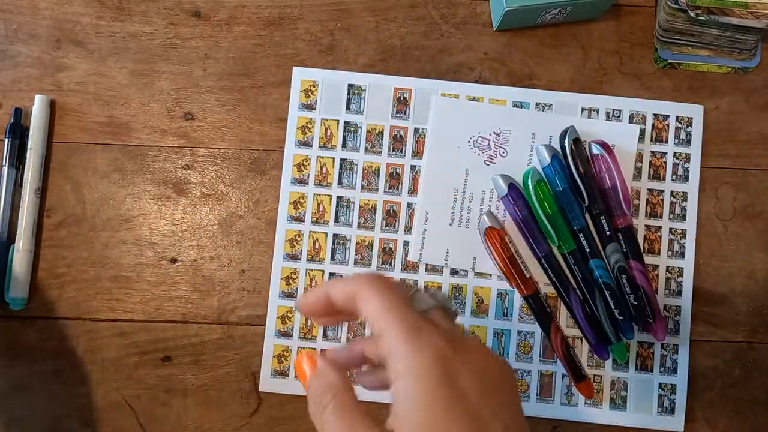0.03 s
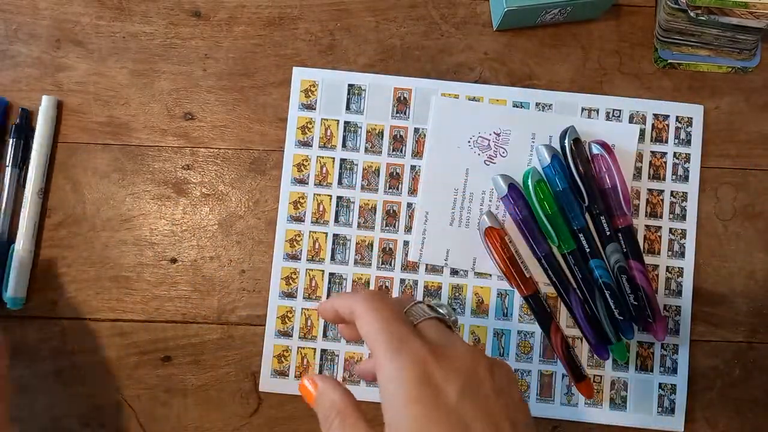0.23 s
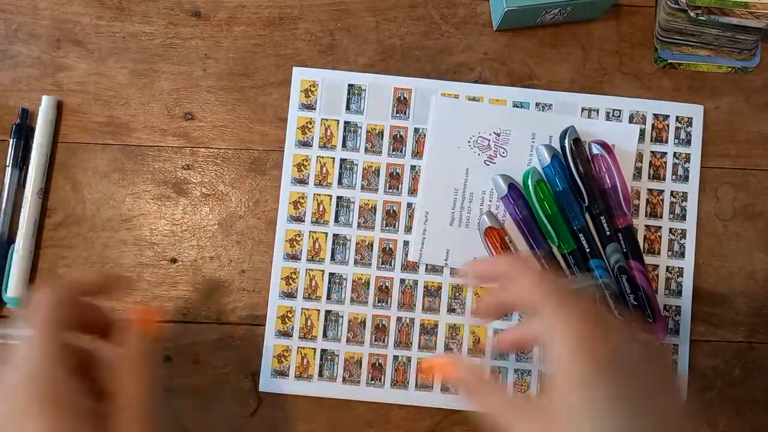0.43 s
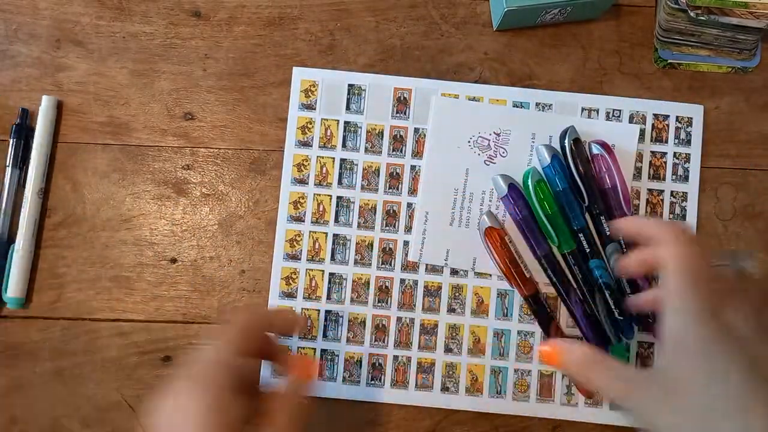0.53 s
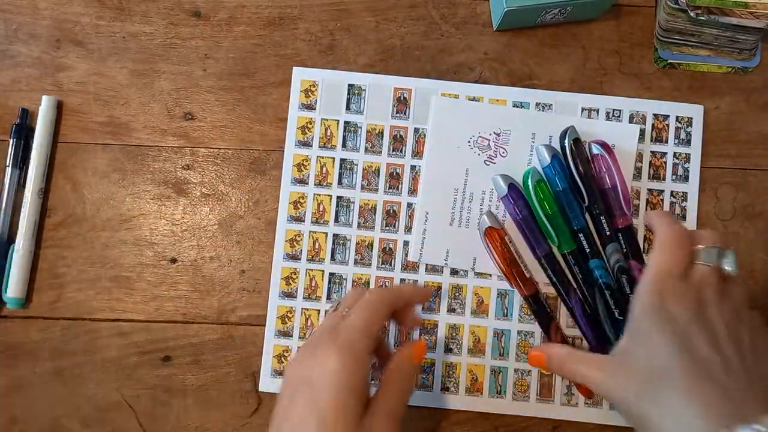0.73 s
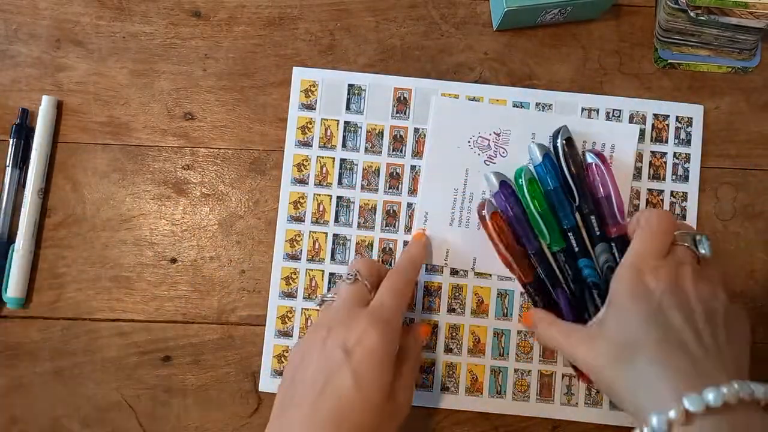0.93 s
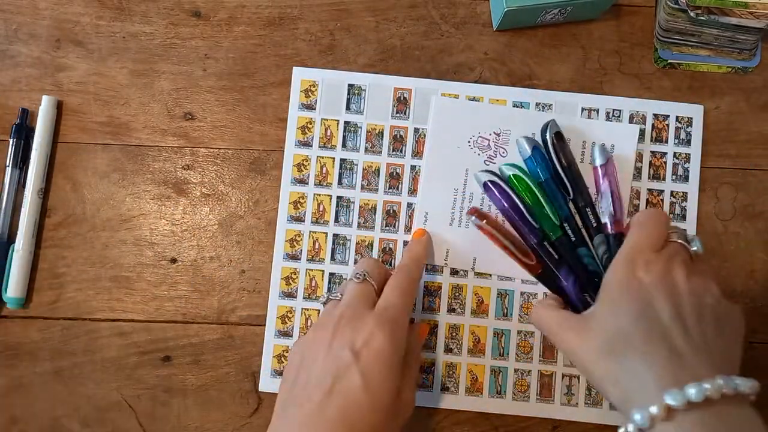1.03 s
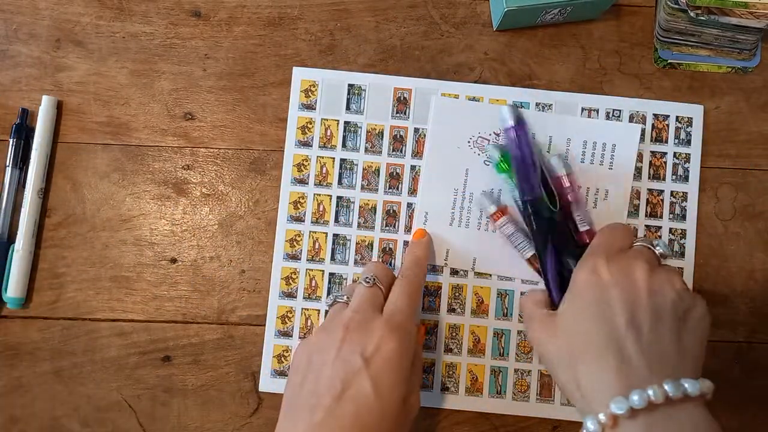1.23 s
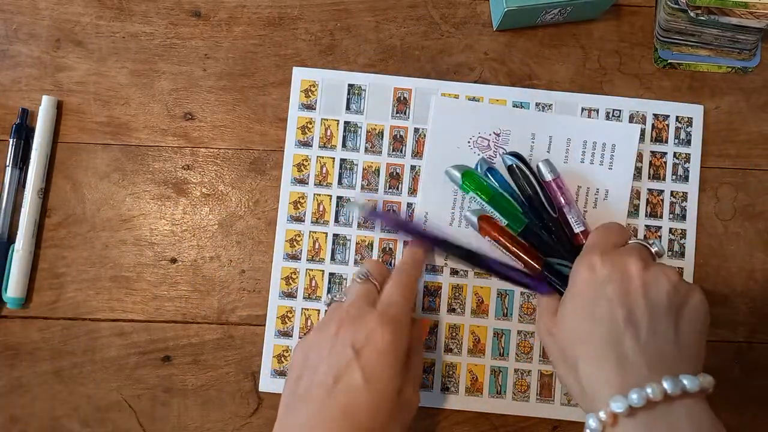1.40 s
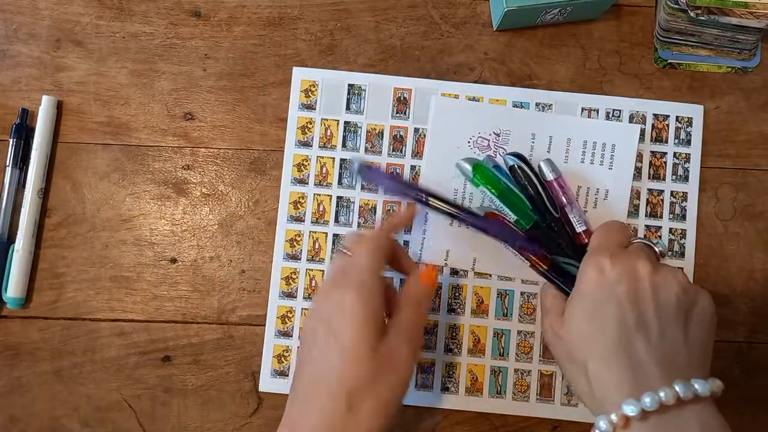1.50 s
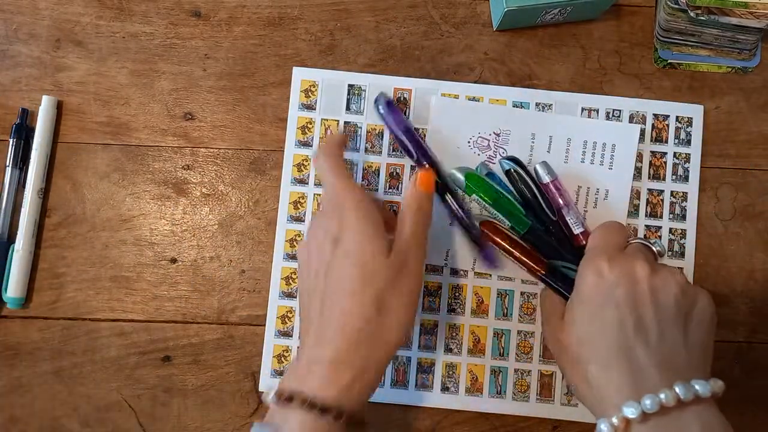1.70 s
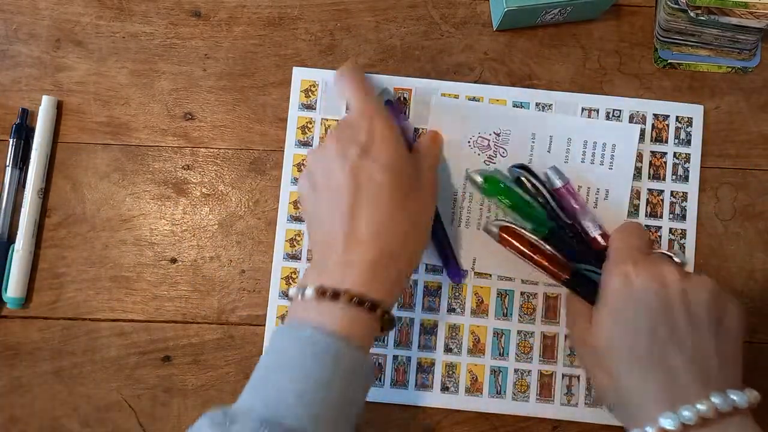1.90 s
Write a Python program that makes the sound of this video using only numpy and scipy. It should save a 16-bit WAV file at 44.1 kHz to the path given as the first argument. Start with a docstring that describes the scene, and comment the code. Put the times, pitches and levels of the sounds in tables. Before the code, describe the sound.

Plastic pens click and rattle together as a hand gathers them up on a wooden table

```python
"""A bunch of plastic pens is gathered: noise bursts with short barrel modes click over a scraping hiss of tiny slips.
First a hand lands on a wooden table: struck modes of the top thump, noise bursts with a low ring knock hard,
and filtered bursts tick as fingernails. Late, sparser clicks and bumps go with one pen drawn out of the bunch.
Resonant noise rubs softly; decaying noise makes a small, lively room, with quiet room tone, in close stereo."""
import sys
import numpy as np
from scipy import signal
from scipy.fft import rfft, irfft
from scipy.io import wavfile

SR = 44100
rng = np.random.default_rng(int(sys.argv[2]) if len(sys.argv) > 2 else 0)


def unload_wav(signal):
    """Save mono or channel-first audio to the path in sys.argv[1] as 16-bit WAV at rate SR, clipped to [-1, 1]."""
    wavfile.write(
        sys.argv[1],
        SR,
        np.round(np.clip(np.atleast_2d(signal).T, -1, 1) * 32767).astype(np.int16),
    )


N = 85995
MS = SR / 1000  # samples per millisecond
T = np.arange(N) / SR
TOP_HZ = 16200
RISE_S = 0.0003  # onset of every hard contact
CLICK_SIDE_DB = -1.5  # stereo width of clicks and scrape, side against mid

# barrels sliding over each other and the paper, before each layer's own offset: (time [s], level [dB])
SLIDING = [(.84, -62.5), (.92, -50.5), (1.02, -53.5), (1.08, -41), (1.14, -45.5), (1.21, -38.5),
           (1.31, -35.5), (1.39, -65), (1.43, -60), (1.53, -47), (1.61, -78), (1.74, -80.5), (1.8, -68),
           (1.95, -63.5)]


def undb(db):
    """Decibels to gain."""
    return 10 ** (np.asarray(db) / 20)


def decay(t, t60):
    """Exponential decay by 60 dB in t60 seconds."""
    return np.exp(-np.log(1000) * t / t60)


def unit(x):
    """Scale to the energy of one millisecond at full level."""
    return x * np.sqrt(MS / np.mean(np.sum(x ** 2, axis=-1)))


def along(points, hz):
    """Read (frequency [Hz], value) points on a log-frequency axis."""
    f, v = np.array(points).T
    return np.interp(np.log(np.maximum(hz, 1)), np.log(f), v)


def colour(x, points, tilt_db=0, size=2048):
    """Minimum-phase EQ through (Hz, dB) points, tilted in dB per octave from 900 Hz to 16 kHz."""
    hz = np.fft.rfftfreq(size, 1 / SR)
    level_db = along(points, hz) + tilt_db * np.log2(np.clip(hz, 900, 16000))
    cepstrum = irfft(np.log(undb(level_db)))
    # Folding the cepstrum forward in time makes the filter causal.
    cepstrum[1:size // 2] *= 2
    cepstrum[size // 2 + 1:] = 0
    impulse = irfft(np.exp(rfft(cepstrum)))
    return signal.fftconvolve(x, impulse[None], axes=-1)[:, :x.shape[-1]]


def stereo(pair, side_db):
    """Mid and side to left and right."""
    return pair[0] + undb(side_db) * pair[1] * np.array([[1], [-1]])


def ring(modes, shift=1, phase=0, size=N // 3):
    """Sum of decaying sine modes, their frequencies multiplied by shift."""
    hz, db, t60 = np.array(modes).T
    t = T[:size, None]
    waves = np.sin(2 * np.pi * hz * shift * t + phase)
    return np.sum(undb(db) * decay(t, t60) * waves, axis=1)


def onset(size):
    """The fast rise of a hard contact."""
    return 1 - np.exp(-T[:size] / RISE_S)


def crack(t60, side_db, size=2048):
    """The brief noise burst of a hard contact."""
    noise = stereo(rng.standard_normal((2, size)), side_db)
    return noise * decay(T[:size], t60) * onset(size)


def add(out, s, x):
    """Mix a sound in at a time in seconds."""
    i = int(s * SR)
    out[:, i:i + x.shape[-1]] += x[:, :N - i]


def curve(points):
    """Gain along (time [s], level [dB]) points, at -120 dB outside."""
    s, db = np.array(points).T
    return undb(np.interp(T, s, db, left=-120, right=-120))


def air():
    """Quiet room tone: shaped noise, alike on both sides in the bass."""
    # spectrum of the room tone: (frequency [Hz], relative level [dB])
    air_colour = [(25, -17), (50, -19), (100, -9), (160, -23), (300, -27.5), (600, -31), (1400, -38),
                  (3000, -34), (5000, -30.5), (6200, -39.5), (12000, -44), (16000, -48)]
    level_db, wide_hz = -64, 460
    hz = np.fft.rfftfreq(N, 1 / SR)
    mid, side = rfft(rng.standard_normal((2, N))) * undb(along(air_colour, hz))
    x = irfft(stereo([mid, side * (hz / (hz + wide_hz))], side_db=2), N)
    return x / x.std() * undb(level_db)


def rubs():
    """Moving hands rub softly: uneven slips through a resonance, swelling and fading."""
    # soft rubs: (centre [s], width [s], peak level [dB], resonance [Hz], Q)
    rub_events = [(0.043, 0.023, -65.5, 2180, 11), (0.234, 0.023, -45, 2130, 1),
                  (.55, 0.05, -68, 11300, 0.54), (0.674, 0.017, -49, 606, 6.3),
                  (0.721, 0.028, -57.5, 602, 3.6)]
    slips_per_s = 11000
    out = np.zeros((2, N))
    for s, width_s, db, hz, q in rub_events:
        slips = (rng.random(N) < slips_per_s / SR) * rng.standard_normal((2, N))
        x = signal.lfilter(*signal.iirpeak(hz, q, fs=SR), stereo(slips, side_db=0))
        x = signal.lfilter(*signal.iirpeak(hz, 1, fs=SR), x)  # steeper skirts
        swell = np.exp(-.5 * ((T - s) / width_s) ** 2)
        out += x / x.std() * undb(db) * swell
    return out


def nails():
    """Fingernails tick on the table: thin, bright noise bursts, each panned by level."""
    # ticks: (time [s], level [dB], left minus right [dB], brightness [dB per octave])
    ticks = [(0.1916, -31, 3.5, 1.5), (0.207, -38.5, -3, -1), (0.2178, -30.5, 4, 10.5),
             (0.2708, -34, -0.5, 3.5), (1.768, -35.5, -3.5, -4)]
    # spectrum of a tick: (frequency [Hz], relative level [dB])
    tick_colour = [(500, -19.5), (1800, -2.5), (4200, 13), (7500, -1.5), (11500, 8), (15500, -2.5)]
    out = np.zeros((2, N))
    for s, db, pan_db, tilt_db in ticks:
        tick = unit(colour(crack(t60=0.0062, side_db=0.5), tick_colour, tilt_db))
        add(out, s, tick * undb(db + np.array([[pan_db], [-pan_db]]) / 2))
    return out


def table():
    """A push and release into the modes of the top; the longer the contact, the deeper the thud."""
    # soft bumps on the table top: (time [s], level [dB], contact time scale [ms])
    bumps = [(.193, -29.5, 1.04), (0.2182, -20, 2.4), (.252, -25, 1.54), (1.057, -40, 18),
             (1.093, -33.5, 17), (1.161, -33, 2.6), (1.205, -29, 0.62), (1.231, -25, 4.3),
             (1.258, -30, 4.9), (1.278, -26.5, 1.34), (1.318, -26, 3.8), (1.448, -33, 1.16),
             (1.456, -24.5, 7.6), (1.5, -24.5, 4.6), (1.773, -39, 8.3), (1.795, -35.5, 7.1),
             (1.884, -36.5, 10), (1.907, -40, 8.7)]
    # modes of the table top: (frequency [Hz], relative level [dB], t60 [s])
    top_modes = [(76.7, -7.5, 0.47), (103, -1.5, 0.32), (139.8, 0.5, 0.25), (158.3, 0.5, 0.21),
                 (208.2, 0.5, 0.31), (236.2, 4.5, 0.23), (295.4, -5.5, 0.34), (359.5, -5, 0.15),
                 (468.7, -11.5, 0.19), (640, -6, 0.091)]
    low_cut_hz, side_db = 63, -15
    out = np.zeros((2, N))
    low_cut = signal.butter(3, low_cut_hz, "high", fs=SR, output="sos")
    for s, db, contact_ms in bumps:
        u = np.arange(1024) / (contact_ms * MS)  # time in contacts
        push = np.gradient(u ** 2 * np.exp(-2 * np.pi * u))
        # Every bump detunes the modes a little.
        shift = 1 + 0.0474 * rng.standard_normal(len(top_modes))
        phase = rng.uniform(0, 2 * np.pi, len(top_modes))
        top = [ring(top_modes, shift), ring(top_modes, shift, phase)]
        thud = signal.fftconvolve(stereo(top, side_db), push[None], axes=-1)
        add(out, s, undb(db) * unit(signal.sosfilt(low_cut, thud)))
    return out


def knocks():
    """Hard blows of the ringed hand: a noise burst clacks and modes ring on below it in level."""
    # hard knocks: (time [s], level [dB], brightness [dB per octave])
    blows = [(.208, -27, -6.5), (0.2207, -23.5, -9), (0.231, -24, -12.5), (0.2704, -15, 2.5)]
    # what rings on after a knock: (frequency [Hz], relative level [dB], t60 [s])
    ringing = [(155.6, 17.5, 0.48), (251.1, 16, 0.19), (745.6, 12.5, 0.13), (905, -6, 0.16),
               (1051, 9, 0.15), (1267, 5, 0.11), (3235, 19.5, 0.028), (4670, 22.5, 0.024)]
    # spectrum of a knock: (frequency [Hz], relative level [dB])
    knock_colour = [(60, -24), (150, -7), (320, -6), (500, -10), (1000, 1.5), (2000, 4), (3300, -0.5),
                    (4800, -4.5), (6000, -13.5), (8000, -26.5), (12000, -26), (15500, -59)]
    t60_s, side_db, ringing_db = 0.039, -1.5, -5  # ringing level is against the burst
    out = np.zeros((2, N))
    for s, db, tilt_db in blows:
        phases = rng.uniform(0, 2 * np.pi, (2, len(ringing)))  # one set per ear
        tone = np.array([ring(ringing, phase=p) for p in phases])
        burst = unit(crack(t60_s, side_db, size=N // 3))
        blow = burst + undb(ringing_db) * unit(tone)
        add(out, s, undb(db) * unit(colour(blow, knock_colour, tilt_db)))
    return out


def scrape():
    """A hiss of dense, tiny slips of plastic on plastic and paper."""
    # spectrum of the hiss: (frequency [Hz], relative level [dB])
    hiss_colour = [(100, 0), (300, 5.5), (500, 3), (1000, 2.5), (2000, 1.5), (4500, 7), (7000, -11.5),
                   (15000, -10.5)]
    slips_per_s, spread_db, hiss_db = 2500, 1, -5.5
    strength = undb(spread_db * np.minimum(rng.exponential(size=N), 4))
    slips = (rng.random(N) < slips_per_s / SR) * strength
    x = colour(stereo(slips * rng.standard_normal((2, N)), CLICK_SIDE_DB), hiss_colour)
    return x / x.std() * curve(SLIDING) * undb(hiss_db)


def click(db, tilt_db, hz):
    """A contact cracks and briefly rings a barrel, which is too thin to radiate bass."""
    # modes of a pen barrel: (multiple of its pitch [ratio], relative level [dB], t60 [s])
    barrel_modes = [(.329, -6, 0.01), (1, 7.5, 0.0085), (1.48, 2, 0.0035)]
    # spectrum of the crack: (frequency [Hz], relative level [dB])
    click_colour = [(200, -43), (1150, -29.5), (1650, -10), (2700, -6), (4000, 2.5), (5600, 3.5),
                    (6700, -1.5), (8200, 1), (10000, -6.5), (12500, -0.5), (15500, -12)]
    contact_t60_s, barrel_db, low_cut_hz = 0.016, -5.5, 1290  # barrel level is against the crack
    modes = [m for m in barrel_modes if m[0] * hz < SR / 2]
    phases = rng.uniform(0, 2 * np.pi, 2)
    barrel = np.array([ring(modes, hz, p, size=2048) for p in phases]) * onset(2048)
    barrel = signal.lfilter(*signal.butter(2, low_cut_hz, "high", fs=SR), barrel)
    contact = unit(colour(crack(contact_t60_s, CLICK_SIDE_DB), click_colour, tilt_db))
    return undb(db) * unit(contact + undb(barrel_db) * unit(barrel))


def pens():
    """The clear clicks, and a rattle of small ones whose level follows the sliding."""
    # pen against pen: (time [s], level [dB], brightness [dB per octave], barrel pitch [Hz])
    clear_clicks = [(0.8509, -48.5, -8, 4940), (0.8755, -28, 0, 5500), (.888, -30.5, -4, 6060),
                    (0.9071, -33, -2, 5600), (.91, -27.5, -1.5, 4470), (1.0374, -23.5, -3.5, 5440),
                    (1.0376, -32.5, -10, 1750), (1.051, -27, 5.5, 5880), (1.0795, -28, 7, 5150),
                    (1.0818, -33.5, -11.5, 5400), (1.0928, -31.5, 1, 3070), (1.1636, -26.5, -5, 5120),
                    (1.168, -28.5, -4.5, 3940), (1.1769, -31, -10, 4150), (1.186, -30, 5, 8100),
                    (1.206, -26, -4.5, 4200), (1.2283, -20.5, 2.5, 4110), (1.239, -28, -2, 3200),
                    (1.246, -39, -15.5, 5000), (1.27, -40, -9, 5260), (1.2741, -24, 4, 7350),
                    (1.2765, -19, -2, 6070), (1.2851, -24, -0.5, 4780), (1.3075, -37, 0, 4600),
                    (1.3234, -38.5, -10, 4200), (1.3375, -31, -3, 2950), (1.363, -45, -1, 4430),
                    (1.380, -33, 1, 8530), (1.3925, -36, 4.5, 5300), (1.448, -38, -4, 5130),
                    (1.5039, -29.5, -7.5, 3800), (1.5072, -26, 3.5, 5450), (1.7005, -48.5, 1.5, 4040),
                    (1.81, -52.5, -3, 3940)]
    rattle_per_s, rattle_db, spread_db = 130, -1, 2.5  # level is against the sliding
    centre_hz, spread_octaves = 5500, 0.41
    out, sliding = np.zeros((2, N)), curve(SLIDING)
    for s, db, tilt_db, hz in clear_clicks:
        add(out, s, click(db, tilt_db, hz))
    chances = np.clip(rng.standard_normal((400, 3)), -2, 2)
    for k, (when, size, pitch) in enumerate(chances):
        s = SLIDING[0][0] + (k + when / 2) / rattle_per_s
        if s < T[-1]:
            hz = min(centre_hz * 2 ** (spread_octaves * pitch), TOP_HZ)
            small = click(rattle_db + spread_db * size, pitch, hz)  # higher is also brighter
            add(out, s, sliding[int(s * SR)] * small)
    return out


def room():
    """Diffuse reflections that build up quickly and die away band by band, with the bass alike on both sides."""
    # decay by band: (frequency [Hz], t60 [s])
    band_t60 = [(200, 0.46), (700, 0.43), (2000, 0.43), (5000, 0.4131), (9000, 0.25), (15000, 0.4059)]
    # spectrum of the reflections: (frequency [Hz], relative level [dB])
    room_colour = [(100, -13.5), (400, 1), (5000, -0.5), (9000, 4.5), (15000, -1.5)]
    delay_s, build_s, wide_hz = 0.0017, 0.0018, 387
    hz = np.fft.rfftfreq(N, 1 / SR)
    mid, side = rfft(rng.standard_normal((2, N)))
    wide = hz / np.hypot(hz, wide_hz)
    noise = stereo([mid * np.sqrt(2 - wide ** 2), side * wide], 0)
    late, tail = np.maximum(T - delay_s, 0), 0
    for f, t60 in band_t60:
        share = along([(g, float(g == f)) for g, _ in band_t60], hz)  # crossfades between bands
        tail = tail + irfft(noise * share, N) * decay(late, t60)
    tail = tail * (1 - np.exp(-late / build_s))
    return colour(unit(tail) / np.sqrt(MS), room_colour)


def scene():
    """All sources, each with its own send to the room, over the room tone."""
    # (sound, room send in dB)
    sources = [(rubs(), -6.5), (nails(), -5.5), (table(), -7), (knocks(), 2.5), (scrape(), -5), (pens(), -4)]
    direct = sum(x for x, _ in sources)
    send = sum(x * undb(db) for x, db in sources)
    return direct + signal.fftconvolve(send, room(), axes=-1)[:, :N] + air()


def record(dry):
    """The left port is brighter in the treble and softer below; the top is cut."""
    left_minus_right = [(1000, -0.57), (4500, -1.1), (9000, 2)]  # (frequency [Hz], level [dB])
    lean_db = along(left_minus_right, np.fft.rfftfreq(N, 1 / SR))
    x = irfft(rfft(dry) * undb(np.array([lean_db, -lean_db]) / 2), N)
    return signal.sosfilt(signal.ellip(8, .2, 70, TOP_HZ, fs=SR, output="sos"), x)


dry = scene()
out = record(dry)
unload_wav(out)
```